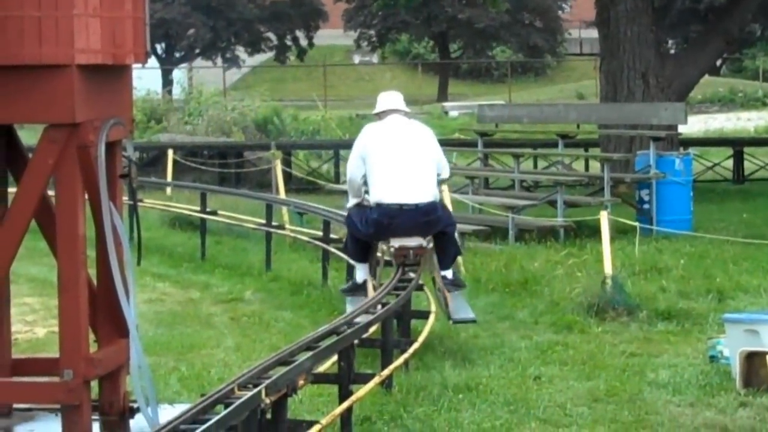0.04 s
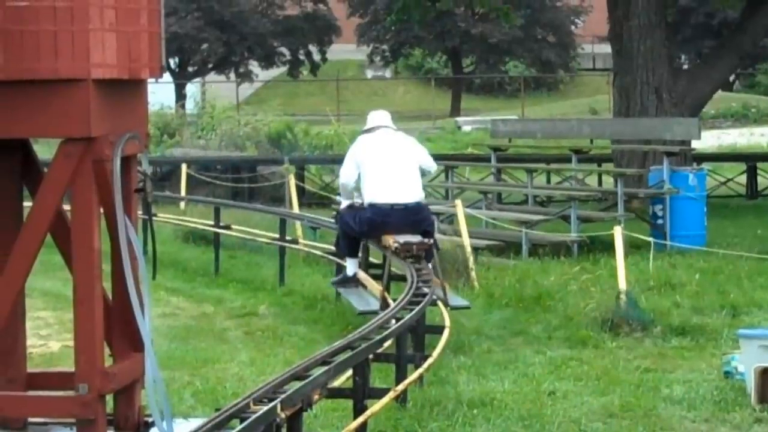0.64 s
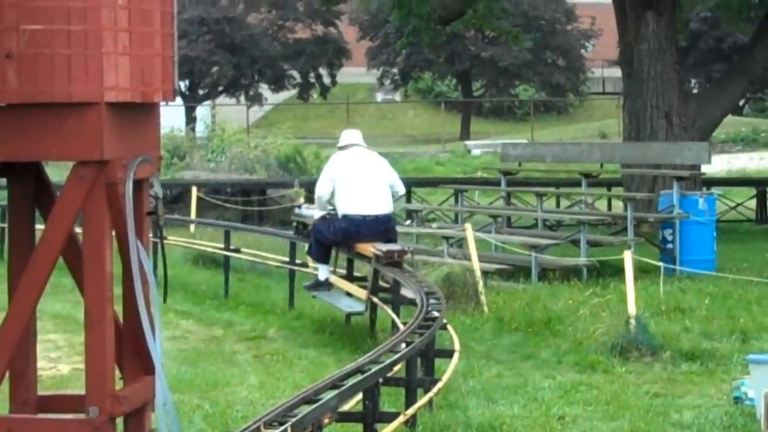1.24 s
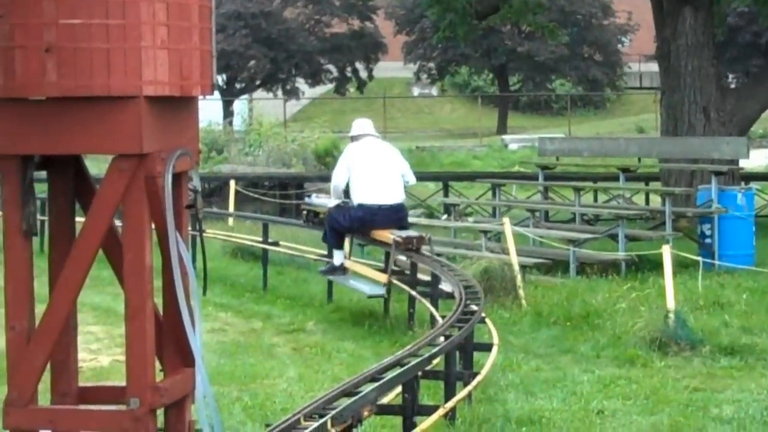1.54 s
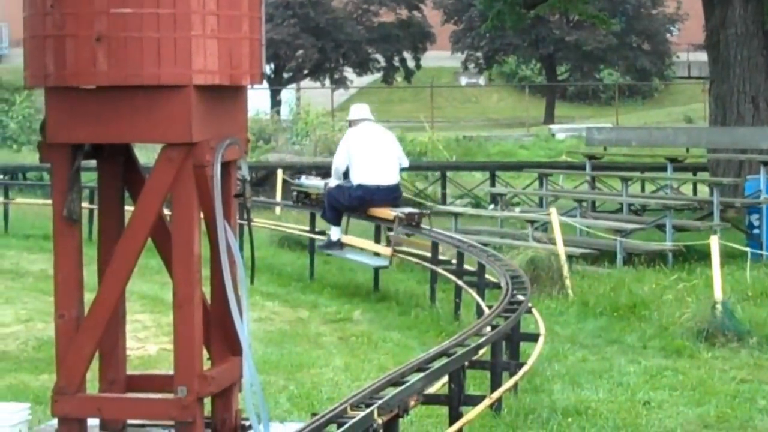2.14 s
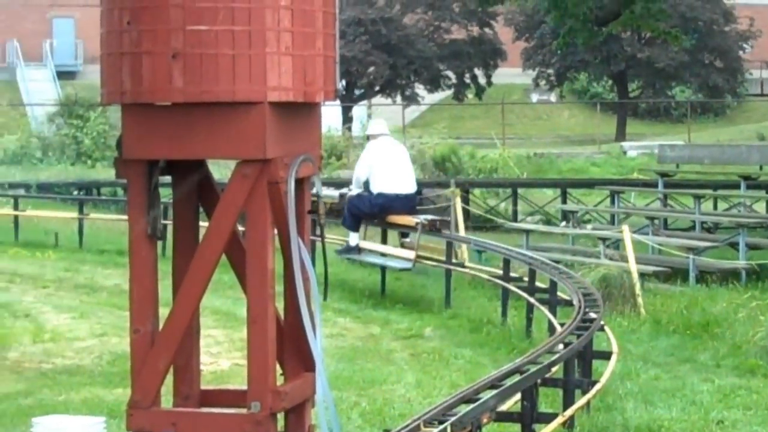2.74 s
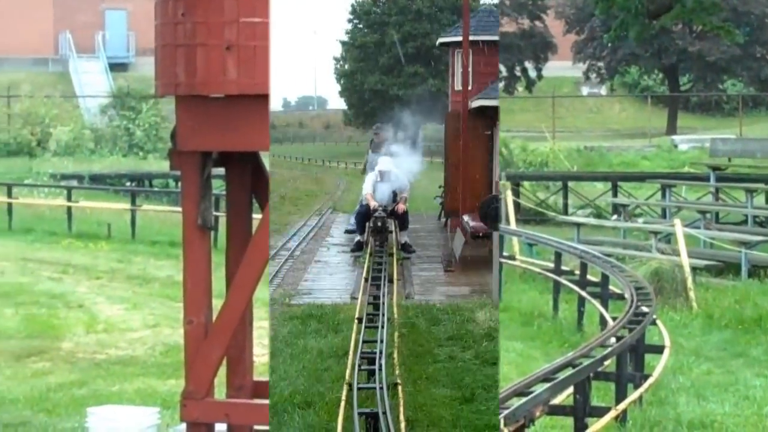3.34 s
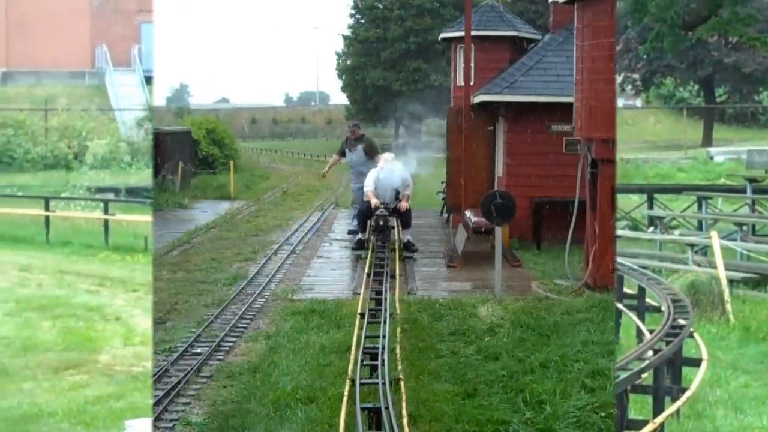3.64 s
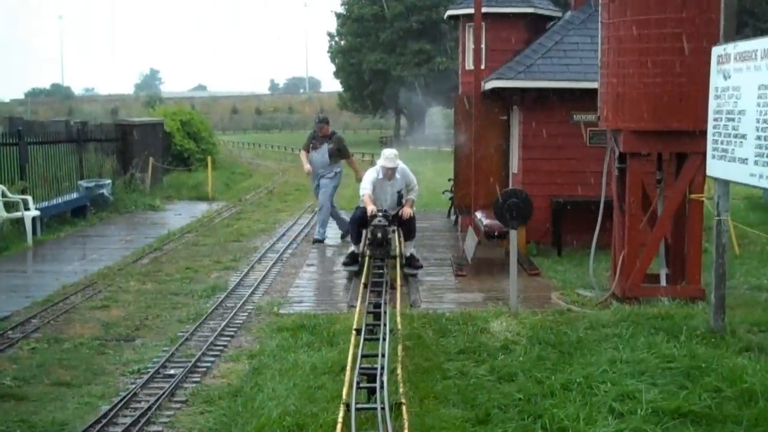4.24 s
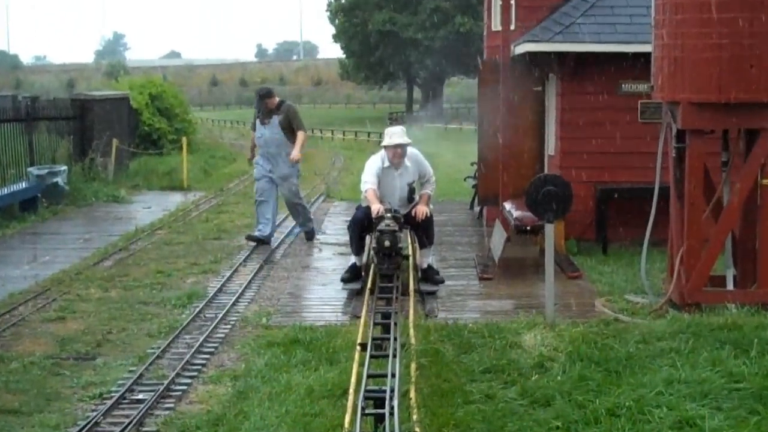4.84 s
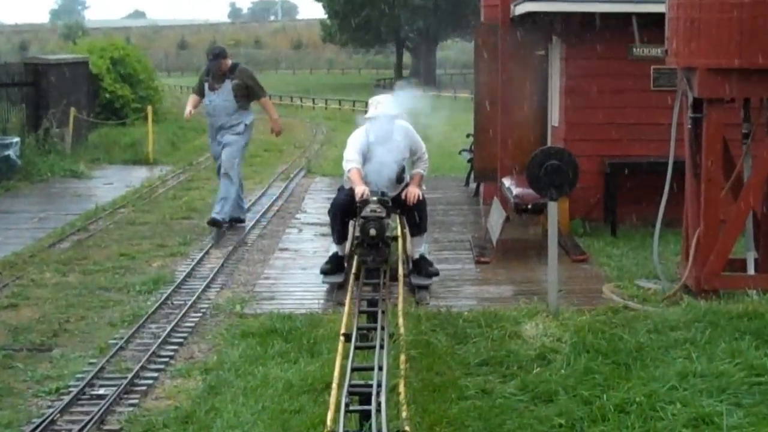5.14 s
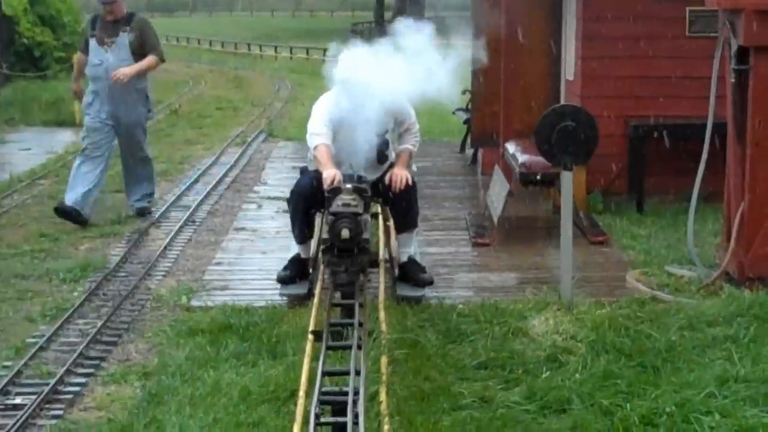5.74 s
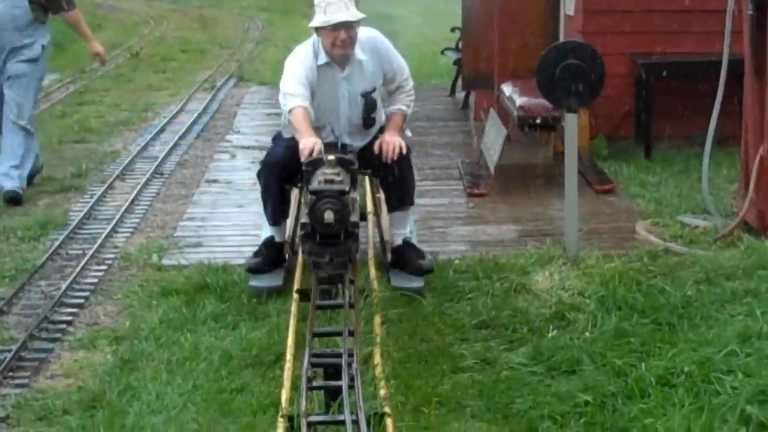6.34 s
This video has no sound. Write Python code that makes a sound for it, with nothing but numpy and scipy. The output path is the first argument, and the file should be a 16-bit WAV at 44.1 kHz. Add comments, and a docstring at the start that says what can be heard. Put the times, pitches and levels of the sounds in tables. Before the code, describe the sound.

A miniature steam locomotive hisses and chuffs softly, moving away and then approaching, with a brief wheel squeal and light wind gusts.

```python
"""A miniature steam locomotive on a garden track draws away round a bend; in a second scene it comes
on from the station. Its turbulent steam jet hisses through the chimney's resonances, pulsed softly by
about twelve exhaust beats a second; it spits water, leaks at a valve and half whistles. Wheels knock
the ironwork and sing by friction on the rail. Gusts buffet the two microphone ports, and behind a low
rolling rumble engines thud and hum far off."""
import sys
import numpy as np
from scipy import signal
from scipy.fft import rfft, irfft, next_fast_len
from scipy.io import wavfile
from scipy.ndimage import map_coordinates

SR = 44100
rng = np.random.default_rng(int(sys.argv[2]) if len(sys.argv) > 2 else 0)


def file_out(sig):
    """Save sig as 16-bit WAV at sys.argv[1]."""
    # one column per channel
    cols = np.atleast_2d(sig).T
    # limit, then scale
    lim = np.clip(cols, -1, 1)
    pcm = np.round(lim * 32767).astype(np.int16)
    wavfile.write(sys.argv[1], SR, pcm)


N = 291501
TIME = np.arange(N) / SR
FFT_SIZE = next_fast_len(N, real=True)
FREQ = np.maximum(np.arange(FFT_SIZE // 2 + 1) * SR / FFT_SIZE, 1)
CHANGE_S = 3.225  # the departure (AWAY) gives way to the approach (NEAR)

# Partials of a far engine. Each row: frequency in Hz, level in dB.
HUM_AWAY = [(134.6, -62), (241, -63)]
HUM_NEAR = [(64.6, -62), (130, -62), (161.5, -69.5)]
# Spectrum of rolling and distant traffic. Each row: frequency in Hz, density in dB per Hz.
RUMBLE_AWAY = [(20, -85), (60, -76.5), (130, -79), (180, -78), (260, -82.5), (430, -83), (750, -80.5),
               (1000, -78), (1350, -74.5), (2000, -98), (4000, -110)]
RUMBLE_NEAR = [(20, -85), (60, -70), (140, -80.5), (220, -82), (400, -79.5), (700, -81), (4000, -110)]
# Fading of rumble and hum at the station. Each row: time in seconds, gain in dB.
DRONE_GAIN = [(4.1, 0), (4.3, -1), (4.75, -1.5), (5, -1.7)]
# Gusts. Each row: peak time in seconds, level in dB, left minus right in dB, half length in seconds.
GUSTS = [(1.29, -50, 18, 0.024), (1.735, -54, 15, 0.075), (1.873, -40.5, 10, 0.018),
         (1.935, -43.5, 13, 0.034), (2.247, -44, 13, 0.023), (2.41, -50, 22, 0.08), (2.785, -45, 17, 0.012),
         (2.855, -43, 20.5, 0.038), (2.984, -43, 18, 0.022), (3.074, -43.5, 22, 0.017),
         (3.295, -36.5, 9.5, 0.022), (3.466, -37, -5, 0.024), (3.561, -33.5, 1, 0.044),
         (3.763, -39, -1, 0.051), (4.074, -43.5, 3, 0.041), (5.321, -44.5, -10, 0.044),
         (5.688, -46, -20, 0.038), (5.79, -46.5, -20, 0.024), (5.954, -41.5, 7, 0.042)]
# Impacts of wheels and couplings. Each row: start in seconds, level in dB, centre in Hz, T60 in seconds.
KNOCKS = [(1.135, -39, 1200, 0.18), (1.486, -35, 1600, 0.19), (1.575, -31.5, 1930, 0.21),
          (1.636, -38, 1810, .12), (3.13, -36, 1100, .12), (3.804, -37, 1000, 0.24),
          (5.127, -24, 3200, 0.079), (6.371, -39, 1060, 0.54), (6.44, -40, 1060, 0.28)]
# The two modes of a rubbing wheel. Each row: time in seconds, level in dB before the surges.
RUB_LOW = [(3.6, -64), (3.8, -49), (4.05, -44), (4.3, -44), (4.47, -41), (4.56, -43), (4.65, -40),
           (4.74, -45.5), (4.83, -43.5), (4.95, -52), (5.3, -62)]
RUB_HIGH = [(3.7, -64), (3.95, -51.5), (4.15, -49.5), (4.55, -51), (4.8, -57), (5.1, -68)]
# Steam let off by a valve. Each row: opening and closing time in seconds, level in dB.
LEAKS = [(0.385, 1.177, -47), (2.922, 3.212, -44)]
# Hollow notes of the steam. Each row: centre in Hz, width in Hz, full level in dB.
WHISTLES = [(1815, 340, -44), (2823, 110, -47.5)]
# Spurts of wet steam. Each row: peak time in seconds, level in dB, centre in Hz.
SPITS = [(.835, -37, 3600), (.865, -38.5, 7000), (.94, -36, 4600), (.975, -36, 5600), (1.008, -35, 4650),
         (1.082, -32, 6640), (1.157, -35, 4400), (1.496, -34, 4000), (1.572, -39, 6000),
         (3.48, -37.5, 3200), (3.568, -35, 3000), (3.808, -36.5, 4970), (3.838, -42, 3780),
         (3.915, -40, 4000), (4.15, -41, 3200), (4.24, -43, 6000), (4.965, -40, 6000), (5.118, -37.5, 5800)]
# Pace of the driving wheels: time of one beat in seconds, beats per second then, rise in rate per second.
DRIVE_AWAY = (.424, 13.47, .58)
DRIVE_NEAR = (3.386, 11.31, .79)
# The four unequal exhaust beats of a wheel turn. Each entry: accent in dB.
ACCENTS_AWAY = [2.4, 3, 0.5, 1.8]
ACCENTS_NEAR = [-1.4, 0.91, -1, -1.3]
# How hard the engine works. Each row: time in seconds, beat level in dB before the accent.
EFFORT_AWAY = [(.3, -50), (.7, -52), (1.55, -39), (1.85, -45), (3.2, -53)]
EFFORT_NEAR = [(3.3, -41.5), (3.5, -36.5), (4.1, -35.8), (4.6, -36), (4.95, -41), (6.6, -42.5)]
# Steady steam flow. Each row: time in seconds, base level in dB, brightness in dB (taken about its mean).
FLOW_AWAY = [(0, -40, -1), (.38, -40.5, -2), (.47, -39, -0.5), (.8, -37.5, -3), (1.13, -36.5, -2.5),
             (1.27, -38.5, -1.5), (1.6, -39, -3.5), (1.95, -40.5, -1.5), (2.3, -40, -3), (2.8, -42.5, -2.5),
             (3.2, -39, -3.5)]
FLOW_NEAR = [(3.23, -37.5, 0.53), (3.5, -37.5, -0.35), (3.9, -38, -0.21), (4.3, -40, 1.4), (4.8, -39, 0.18),
             (5.25, -38.5, 0.017), (5.6, -38.5, 2.7), (6.6, -37.5, -0.17)]
# Spectrum of the jet from behind and from the front. Each row: frequency in Hz, relative level in dB.
JET_AWAY = [(300, -58), (800, -12), (1600, -4.5), (2000, 1), (3000, 4), (3800, 3), (4400, -1.5), (6000, -7),
            (7400, -8.5), (10000, -22.5), (14000, -27)]
JET_NEAR = [(300, -24), (750, -6), (1100, 0), (1500, -3), (2300, 3.5), (3600, 3), (4400, -1.5),
            (6000, -2.5), (7400, -2.5), (10000, -12), (14000, -13)]
# Resonances of chimney and smokebox. Each row: centre in Hz, width in Hz, lift in dB.
CHIMNEY_AWAY = [(990, 86, 9.5), (1299, 245, 8.5), (1876, 30, 6), (3766, 47, 4.5)]
CHIMNEY_NEAR = [(598, 136, 8.8), (903, 250, 4), (1346, 300, 3.4), (1710, 270, 3.8), (2240, 91, 0.86),
                (2750, 190, 3.6), (3480, 82, 4)]
# Likeness of the two channels. Each row: frequency in Hz, correlation.
LIKE_AWAY = [(300, 0.75), (1240, 0.95), (2270, 0.62), (4160, 0.66), (7600, 0.36), (14000, .1)]
LIKE_NEAR = [(300, 0.73), (680, 0.95), (1240, 0.83), (2270, 0.54), (4160, 0.18), (6400, 0.25), (12000, .1)]
LIKE_RUMBLE = [(50, 0.24), (200, 0.97), (700, 0.87)]
# Resonant response of each microphone port. Each row: frequency in Hz, gain in dB.
PORT_LEFT = [(4000, 1), (5000, 2), (6200, 3), (7350, 8.5), (8500, 3), (10000, 1), (12500, -3),
             (14200, -2.5)]
PORT_RIGHT = [(4000, 0.5), (5000, 4.5), (6100, 10.5), (7350, -6), (8500, -4.5), (10000, -11.5),
              (12500, -15), (14200, -20)]
# Lead of the left port for sound from the front. Each row: frequency in Hz, phase in radians.
PORT_PHASE = [(2500, 0), (3400, 0), (5900, 3), (7000, 5), (14000, 4)]


def undb(db):
    """Amplitude grows tenfold for every 20 dB."""
    return 10 ** (np.asarray(db) / 20)


def colour(points):
    """Interpolation on a log frequency axis turns (Hz, value) points into a spectrum."""
    hz, value = np.transpose(points)
    return np.interp(np.log(FREQ), np.log(hz), value)


def resonance(hz, width_hz):
    """Gain of a damped oscillator, 1 at its natural frequency."""
    return 1 / np.sqrt(1 + ((FREQ ** 2 - hz ** 2) / (FREQ * width_hz)) ** 2)


def shape(x, gain):
    """Linear filtering multiplies the spectrum by a gain."""
    return irfft(rfft(x, FFT_SIZE) * gain, FFT_SIZE)[..., :N]


def unit(x):
    """Normalisation to rms 1."""
    return x / np.sqrt(np.mean(x ** 2))


def noise(gain, likeness):
    """Coloured stereo noise: the balance of mid and side power sets the correlation."""
    alike = np.clip(colour(likeness), -1, 1)
    mid = shape(rng.standard_normal(N), gain * np.sqrt((1 + alike) / 2))
    side = shape(rng.standard_normal(N), gain * np.sqrt((1 - alike) / 2))
    return np.array([mid + side, mid - side])


def wander(rate_hz):
    """Low-passed noise gives a smooth random fluctuation of rms 1."""
    return unit(shape(rng.standard_normal(N), 1 / (1 + (FREQ / rate_hz) ** 4)))


def swell(age, rise_s, fall_s):
    """Power envelope: a Gaussian rise to age 0, then exponential decay."""
    return np.where(age < 0, np.exp(-(age / rise_s) ** 2), np.exp(-np.abs(age) / fall_s))


def held(start_s, end_s, ramp_s):
    """Trapezoidal envelope: a straight rise, a hold and a straight fall."""
    return np.clip(np.minimum(TIME - start_s, end_s - TIME) / ramp_s, 0, 1)


def hum(partials, waver_hz, waver_db):
    """Periodic motion in a far engine radiates a line spectrum; each line wavers."""
    lines = 0
    for hz, db in partials:
        rms = undb(db + waver_db * wander(0.65))
        phase = 2 * np.pi * np.cumsum(hz + waver_hz * wander(4.4)) / SR
        lines += np.sqrt(2) * rms * np.sin(phase)
    return lines


def thudding(first_s, per_s, hz, width_hz, level_db, scatter_db, echo_s, echo_db):
    """Impulse excitation: a far engine's regular, unequal pulses ring a low resonance, faintly echoed."""
    times = np.arange(first_s, TIME[-1], 1 / per_s)
    pulses = np.zeros(N)
    pulses[(times * SR).astype(int)] = undb(scatter_db * np.tanh(rng.standard_normal(len(times))))
    exhaust = 1 / (1 + 1j * (FREQ ** 2 - hz ** 2) / (FREQ * width_hz)) ** 2
    echo = 1 + undb(echo_db) * np.exp(-2j * np.pi * FREQ * echo_s)
    return undb(level_db) * unit(shape(pulses, exhaust * echo))


def rumble(spectrum, swell_db):
    """Random vibration from rolling and distant traffic radiates low noise that swells a little."""
    rolling = noise(undb(colour(spectrum)) * np.sqrt(SR / 2), LIKE_RUMBLE)
    return rolling * undb(swell_db * wander(10))


def wind(low_hz, top_hz, buffet_db, breeze_peak_s, breeze_db, breeze_left_db):
    """Turbulent pressure: eddies thump each port separately, in gusts riding on one swell of breeze."""
    band = 1 / np.sqrt((1 + (low_hz / FREQ) ** 2) * (1 + (FREQ / top_hz) ** 5))
    breeze = swell(TIME - breeze_peak_s, rise_s=1.33, fall_s=0.26)
    ports = []
    for side in (.5, -.5):  # left, right
        power = undb(breeze_db + side * breeze_left_db) ** 2 * breeze
        for s, db, left_db, half_s in GUSTS:
            power += undb(db + side * left_db) ** 2 * np.exp(-((TIME - s) / half_s) ** 2)
        eddies = shape(rng.standard_normal(N) * undb(buffet_db * np.tanh(wander(59))), band)
        ports.append(unit(eddies) * np.sqrt(power))
    return np.array(ports)


def knocks(rise_s):
    """Each impact shakes loose ironwork into a broad rattle, which damping makes decay exponentially."""
    out = np.zeros((2, N))
    for s, db, hz, t60 in KNOCKS:
        age = np.maximum(TIME - s, 0)
        rattle = unit(noise(resonance(hz, 0.78 * hz) ** 2, LIKE_NEAR))
        out += undb(db) * rattle * (1 - np.exp(-age / rise_s)) * np.exp(-np.log(1000) * age / t60)
    return out


def wheel_squeal(thrust, skirt_db, pitch_waver, rough_db, surge_db):
    """Uneven friction on the rail sustains two wheel modes, which surge with each piston thrust."""
    core = resonance(hz=1875, width_hz=65) ** 2
    skirt = undb(skirt_db) * resonance(hz=1990, width_hz=480) ** 2
    # reading the lower mode at a varying speed bends its pitch
    position = np.arange(N) + np.cumsum(pitch_waver * wander(17.6))
    ring = noise(core + skirt, LIKE_NEAR)
    low = np.array([map_coordinates(channel, [position], mode="mirror") for channel in ring])
    high = noise(resonance(hz=6400, width_hz=900) ** 2, LIKE_NEAR)
    rub = 0
    for mode, level in [(low, RUB_LOW), (high, RUB_HIGH)]:
        level_db = np.interp(TIME, *np.transpose(level), left=-np.inf, right=-np.inf)
        rub += unit(mode) * undb(level_db + rough_db * np.tanh(wander(22)))
    return rub * undb(surge_db * thrust)


def leaks(hz, width_hz, top_hz, ramp_s):
    """Turbulent flow through a valve sizzles thinly for as long as it is open."""
    opening = sum(undb(db) * held(opens, closes, ramp_s) for opens, closes, db in LEAKS)
    band = resonance(hz, width_hz) ** 2 / (1 + (FREQ / top_hz) ** 8)
    return unit(noise(band, LIKE_AWAY)) * opening


def whistles(start_s, rise_s, flutter_db):
    """Flow-excited resonance: steam across narrow openings sings breathy notes as the engine nears."""
    notes = 0
    for hz, width_hz, db in WHISTLES:
        breath = noise(resonance(hz, width_hz) ** 2, LIKE_NEAR)
        notes += undb(db) * unit(breath * undb(flutter_db * wander(16)))
    return notes * np.clip((TIME - start_s) / rise_s, 0, 1)


def spits(relative_width, top_hz, rise_s, fall_s, sputter_db):
    """Two-phase flow: water carried with the steam sputters in spurts, each with its own brightness."""
    sputter = undb(sputter_db * wander(350))
    spray = noise(1 / (1 + (FREQ / top_hz) ** 8), LIKE_AWAY) * sputter
    out = 0
    for s, db, hz in SPITS:
        spurt = unit(shape(spray, resonance(hz, relative_width * hz) ** 2))
        out += spurt * undb(db) * np.sqrt(swell(TIME - s, rise_s, fall_s))
    return out


def beats(drive, accents, effort, rise_s, fall_s):
    """Exhaust power under uniform acceleration: four unequal beats a wheel turn, scaled by the effort."""
    beat_s, rate, quickening = drive
    age = TIME - beat_s
    count = rate * age + quickening * age ** 2 / 2
    power = np.zeros(N)
    for k in range(int(count[0]) + 1, int(count[-1]) + 1):
        peak_s = TIME[np.searchsorted(count, k)]
        span = slice(*np.searchsorted(count, [k - 1, k + 2]))
        db = np.interp(peak_s, *np.transpose(effort)) + accents[k % len(accents)]
        power[span] += undb(db) ** 2 * swell(TIME[span] - peak_s, rise_s, fall_s)
    return power


def steam(flow, jet, chimney, likeness, puffs, body_db, treble_db, puff_treble_db, unsteady_db):
    """Jet turbulence, coloured by the chimney; steady flow and puffs are incoherent, so powers add."""
    s, flow_db, brightness_db = np.transpose(flow)
    steady_db = np.interp(TIME, s, flow_db) + unsteady_db * wander(5.8)
    tilt_db = np.interp(TIME, s, brightness_db - np.mean(brightness_db))
    chimney_db = sum(db * resonance(hz, width_hz) ** 2 for hz, width_hz, db in chimney)
    hiss = unit(noise(undb(colour(jet) + chimney_db), likeness))
    body = shape(hiss, 1 / (1 + (FREQ / 4700) ** 6))
    treble = hiss - body
    body_gain = np.sqrt(undb(steady_db + body_db) ** 2 + puffs)
    treble_gain = np.sqrt(undb(steady_db + tilt_db + treble_db) ** 2 + puffs * undb(puff_treble_db) ** 2)
    return body * body_gain + treble * treble_gain


def head_on(x):
    """Phase difference: sound from the front reaches the two ports out of step in the treble."""
    lead = colour(PORT_PHASE) / 2
    return shape(x, np.exp(1j * np.array([lead, -lead])))


def scene():
    """Superposition of the engine, departing and then approaching, with track noise and wind."""
    puffs_away = beats(DRIVE_AWAY, ACCENTS_AWAY, EFFORT_AWAY, rise_s=.013, fall_s=.018)
    away = steam(FLOW_AWAY, JET_AWAY, CHIMNEY_AWAY, LIKE_AWAY, puffs_away,
                 body_db=4.5, treble_db=5, puff_treble_db=1.5, unsteady_db=0.8)
    away += rumble(RUMBLE_AWAY, swell_db=1.5) + hum(HUM_AWAY, waver_hz=1, waver_db=0)
    away += thudding(first_s=.022, per_s=15.07, hz=185, width_hz=130,
                     level_db=-55, scatter_db=4.5, echo_s=.031, echo_db=-12)

    puffs_near = beats(DRIVE_NEAR, ACCENTS_NEAR, EFFORT_NEAR, rise_s=.015, fall_s=.02)
    near = steam(FLOW_NEAR, JET_NEAR, CHIMNEY_NEAR, LIKE_NEAR, puffs_near,
                 body_db=4, treble_db=3.5, puff_treble_db=-18, unsteady_db=0.66)
    drone = rumble(RUMBLE_NEAR, swell_db=.5) + hum(HUM_NEAR, waver_hz=1, waver_db=3.5)
    near += drone * undb(np.interp(TIME, *np.transpose(DRONE_GAIN)))

    fade = np.pi / 2 * np.clip((TIME - CHANGE_S) / 0.011 + .5, 0, 1)  # equal power, over 11 ms
    mix = away * np.cos(fade) + head_on(near) * np.sin(fade)
    mix += spits(relative_width=1.5, top_hz=10000, rise_s=0.0087, fall_s=0.0097, sputter_db=2)
    mix += leaks(hz=5970, width_hz=4900, top_hz=9500, ramp_s=0.016)
    mix += whistles(start_s=4.1, rise_s=1.43, flutter_db=2.5)
    mix += knocks(rise_s=.002)
    thrust = beats(DRIVE_NEAR, ACCENTS_NEAR, effort=[(0, 0)], rise_s=.018, fall_s=.025)
    mix += wheel_squeal(thrust, skirt_db=-5.5, pitch_waver=.013, rough_db=2.5, surge_db=5)
    mix += wind(low_hz=65.7, top_hz=159, buffet_db=6,
                breeze_peak_s=3.57, breeze_db=-48, breeze_left_db=6.5)
    return mix


def record(dry):
    """Resonance colours the treble differently in each port; a steep low-pass cuts off the top."""
    ported = shape(dry, undb(np.array([colour(PORT_LEFT), colour(PORT_RIGHT)])))
    low_pass = signal.ellip(12, .2, 70, 14200, fs=SR, output="sos")
    return signal.sosfilt(low_pass, ported)


dry = scene()
out = record(dry)
file_out(out)
```